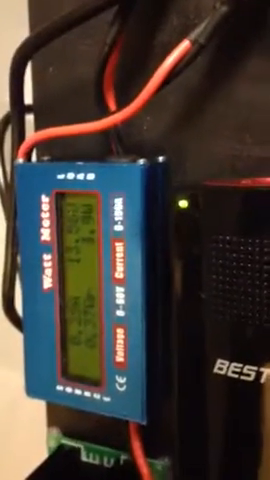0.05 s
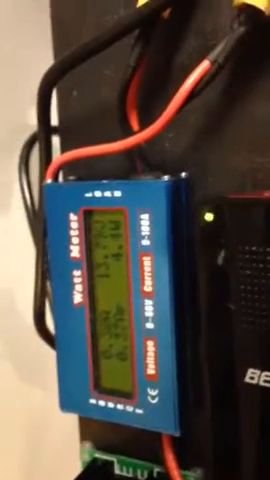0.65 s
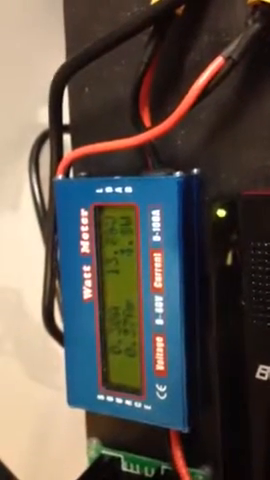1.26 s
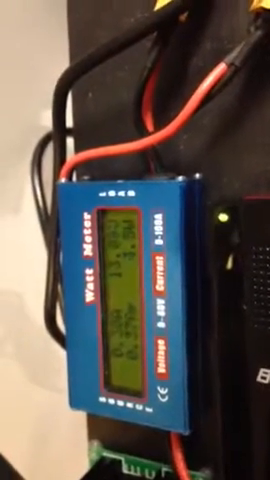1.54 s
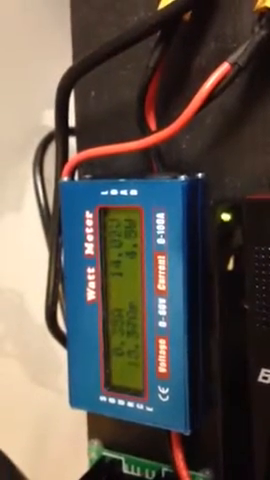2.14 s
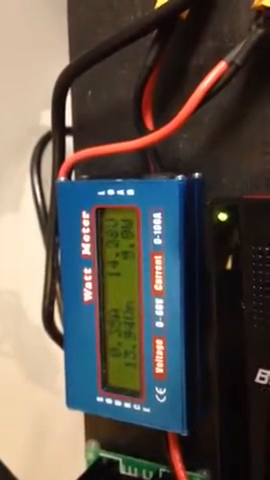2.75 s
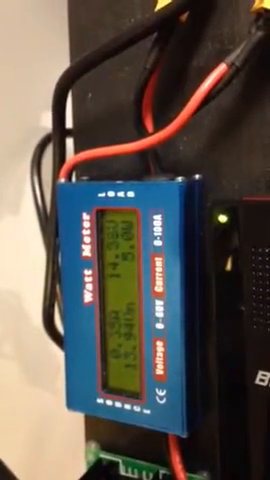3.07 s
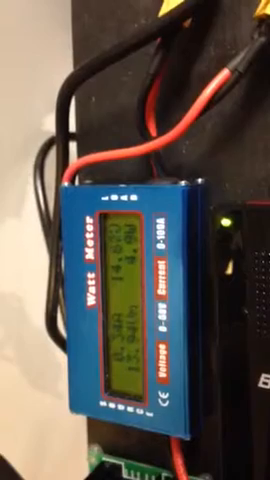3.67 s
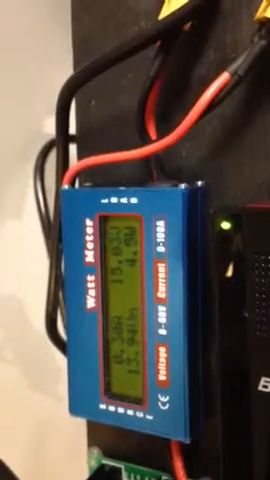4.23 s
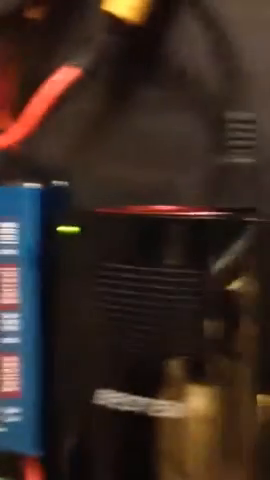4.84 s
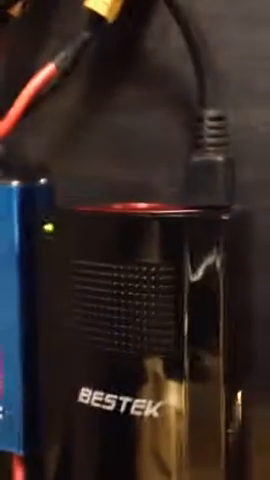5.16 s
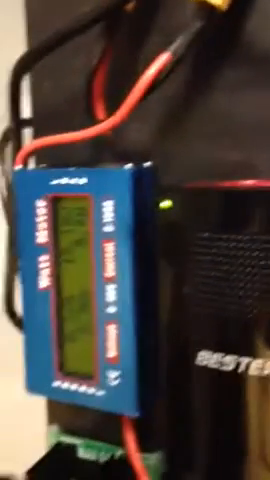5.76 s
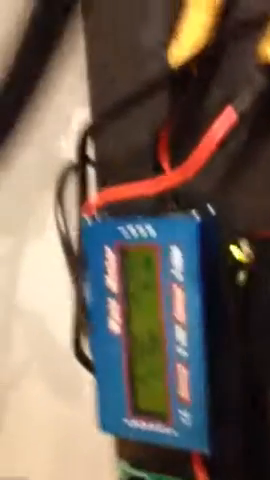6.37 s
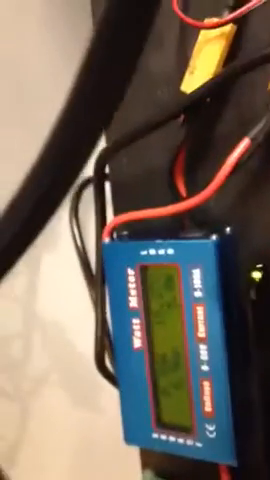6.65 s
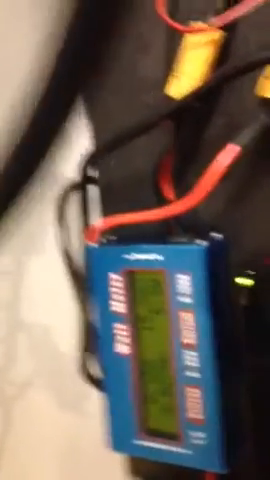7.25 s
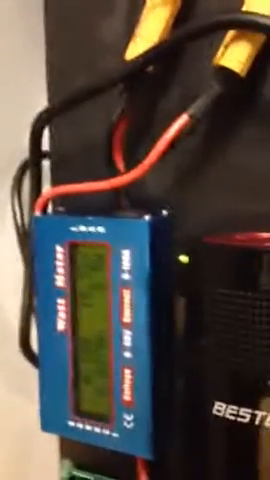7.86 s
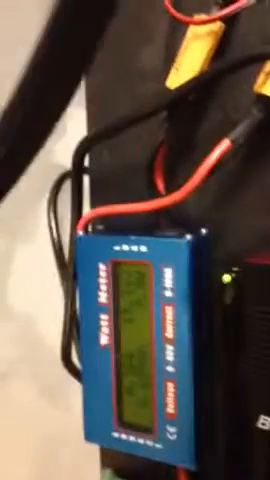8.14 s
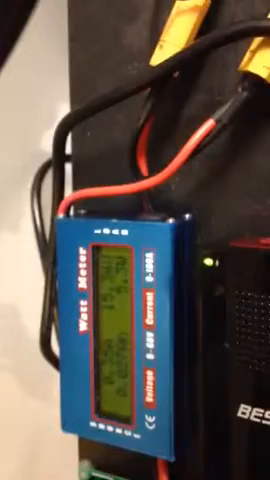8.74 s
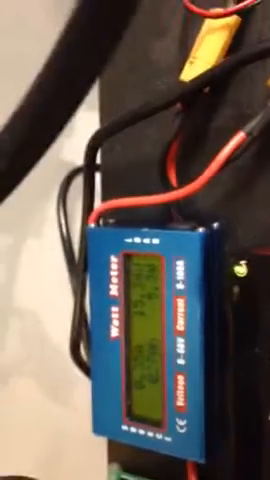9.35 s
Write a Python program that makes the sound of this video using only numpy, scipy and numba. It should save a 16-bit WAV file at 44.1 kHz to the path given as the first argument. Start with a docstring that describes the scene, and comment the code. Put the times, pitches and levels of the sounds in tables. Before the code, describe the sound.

Air rushes and hisses through a power inverter's fan, which hums and whines as it gradually speeds up.

```python
"""A power inverter's small cooling fan, slowly speeding up; indoors, close by, on a hand-held phone.
The shaft hums, and blade and motor orders swell and fade as they glide through fixed resonances.
Air rushes through the grille, louder with speed, over a faint room rumble. Short, dull swells and
thin whistles come and go. The microphone moves between a few resting places, each with its own
reflection and air gap, and picks up a fine sizzle when it faces the vent."""
import sys
import numpy as np
from scipy import signal
from scipy.fft import rfft, irfft, next_fast_len
from scipy.io import wavfile
from scipy.ndimage import uniform_filter1d
from numba import njit

SR = 44100
rng = np.random.default_rng(int(sys.argv[2]) if len(sys.argv) > 2 else 0)


def generate_wav(signal):
    """Clip the signal to [-1, 1] and save it as 16-bit WAV at the path in sys.argv[1]."""
    frames = np.transpose(np.atleast_2d(signal))
    scaled = np.clip(frames, -1, 1) * 32767
    pcm = np.round(scaled).astype(np.int16)
    wavfile.write(sys.argv[1], SR, pcm)


N = 419391
TIME = np.arange(N) / SR


def undb(db):
    """Decibels to gain."""
    return 10 ** (np.asarray(db) / 20)


def unit(x):
    """Scale to rms 1."""
    return x / np.sqrt(np.mean(x ** 2))


def noise(colour):
    """Noise of rms 1, shaped by (frequency [Hz], level [dB]) points and rolled off below the first."""
    size = next_fast_len(N)
    hz, db = np.transpose(colour)
    bins = np.maximum(np.arange(size // 2 + 1) * SR / size, 1)
    gain = undb(np.interp(np.log(bins), np.log(hz), db)) * np.minimum(bins / hz[0], 1) ** 2
    return unit(irfft(rfft(rng.standard_normal(size)) * gain, size)[:N])


def drift(rate_hz):
    """A smooth random curve of rms 1 that changes about rate_hz times a second."""
    step = int(SR / rate_hz)
    knots = rng.standard_normal(N // step + 2)
    joined = np.interp(np.arange(N) / step, np.arange(len(knots)), knots)
    return unit(uniform_filter1d(joined, step))


def tone(angle, flutter_db, flutter_hz):
    """A sine of rms near 1 whose level flutters."""
    return np.sqrt(2) * np.sin(angle + rng.uniform(0, 2 * np.pi)) * undb(flutter_db * drift(flutter_hz))


def hand_move(middle_s, move_s=0.21):
    """Goes from 0 to 1 as the hand carries the microphone to its next place."""
    return np.clip((TIME - middle_s) / move_s + .5, 0, 1)


# the fan speeding up (time [s], shaft speed [Hz])
SHAFT_SPEED = [(0.0, 170.3), (0.13, 169.8), (0.45, 170.6), (1.11, 171.1), (1.24, 172.3), (2.7, 177.3),
               (3.55, 181.3), (4.07, 184.8), (4.63, 187.3), (6.08, 188.3), (6.38, 189.0), (7.91, 189.8),
               (9.5, 191.2)]

def shaft(wander=0.000291):
    """The shaft's speed [Hz] and its angle [rad], which wanders a little."""
    speed = np.interp(TIME, *np.transpose(SHAFT_SPEED))
    angle = 2 * np.pi * np.cumsum(speed * (1 + wander * drift(9))) / SR
    return speed, angle


# peaks and notches of casing and room (frequency [Hz], half width [Hz], gain [dB])
RESONANCES = [(169.5, 4.2, -4), (183.24, 3.3, -10.5), (188.2, 2.05, -6), (358.4, 9, 7.5), (685, 14, 10),
              (1480, 49, 10), (3810, 180, 15.5), (4317, 190, -13), (4550, 40, 3.5), (4900, 84, 5),
              (5040, 42, -11), (5610, 76, -3.5), (6150, 164, -14)]
# standing-wave nulls the microphone sits in (entry [s], exit [s], order [x shaft speed], gain [dB])
MIC_NULLS = [(4.447, 4.7, 1, -5), (5.8, 7.3, 1, -3), (6.5, 7.5, 8, -4), (6.5, 7.45, 24, -19),
             (7.403, 8.15, 28, -11), (8.15, 9.15, 28, -7.5)]

def path_gain_db(order, speed):
    """From fan to microphone, an order glides through resonances and dips in standing-wave nulls."""
    speeds = np.linspace(speed.min(), speed.max(), 400)
    peaks = sum(db * np.exp(-((order * speeds - hz) / width) ** 2) for hz, width, db in RESONANCES)
    dips = sum(db * (hand_move(entry_s) - hand_move(exit_s))
               for entry_s, exit_s, nulled, db in MIC_NULLS if nulled == order)
    return np.interp(speed, speeds, peaks) + dips


# strong blade and motor orders, before the path to the microphone (order [x shaft speed], level [dB])
BLADE_WHINES = [(8, -63), (20, -85.5), (24, -71), (28, -67.3), (32, -69.5)]
# weak shaft orders, before the same path (order [x shaft speed], level [dB])
SHAFT_OVERTONES = [(2, -82), (3, -85.5), (4, -85.5), (5, -78), (10, -66.5), (16, -83), (25, -81.5),
                   (26, -80.5), (29, -86.5), (30, -86), (31, -88), (33, -85.5), (36, -84)]

def rotor(angle, speed, hum_db=-51.5, stray_db=-76):
    """Unbalance hums once a turn; blades and motor poles whine at multiples of it."""
    # stray room paths make the hum waver most where it is weak
    hum_gain = undb(hum_db + path_gain_db(1, speed)) + undb(stray_db) * drift(9)
    out = hum_gain * tone(angle, flutter_db=-0.3, flutter_hz=6.4)
    for order, db in BLADE_WHINES:
        out += undb(db + path_gain_db(order, speed)) * tone(order * angle, flutter_db=0.87, flutter_hz=22)
    for order, db in SHAFT_OVERTONES:
        out += undb(db + path_gain_db(order, speed)) * tone(order * angle, flutter_db=2.0, flutter_hz=4)
    return out


# air rush, close to the housing (frequency [Hz], relative level [dB])
RUSH_COLOUR = [(250, -33.5), (520, -21), (645, -25), (850, -12), (1020, -15), (1230, -3), (1380, -3.5),
               (1570, 0.5), (1760, -5), (1900, -4.5), (2150, -10.5), (2450, -10.5), (2950, -24),
               (3250, -20.5), (3650, -30.5), (4200, -28), (6200, -36.5), (9000, -53)]
# hiss, close to the grille (frequency [Hz], relative level [dB])
HISS_COLOUR = [(2000, -15), (4000, 11), (5700, 2.5), (6400, 1), (7000, 3), (8600, 0.5), (10500, -3.5),
               (12400, -10), (13400, -5), (15200, -11)]

def airflow(angle, speed, rush_gain_db, hiss_gain_db, reference_hz=188):
    """Turbulence rings the housing and hisses in the grille; both grow with speed."""
    octaves = np.log2(speed / reference_hz)
    rush_db = -46.5 + 16 * octaves + rush_gain_db
    hiss_db = -68.5 + 17 * octaves + hiss_gain_db
    rush = noise(RUSH_COLOUR) * undb(rush_db + 0.5 * drift(70))
    hiss = noise(HISS_COLOUR) * undb(hiss_db + 0.44 * drift(30))
    chopping = 1 + 0.14 * np.cos(4 * angle)  # four times a turn
    return rush + hiss * chopping


# where the microphone rests, all close to the fan (mid-move time [s], rush gain [dB], hiss gain [dB],
# reflection lag [ms], reflection share [0-1], air gap pitch [Hz], gap strength [0-1], facing vent [0-1])
MIC_PLACES = [(0, 0.05, 1, 0.25, 0.023, 3070, .06, 0), (4.8, 1, -1.7, 0.72, 0.046, 3190, .25, 1),
              (5.8, .4, 0.5, .6, 0.019, 3140, .12, 0.3), (6.42, -1.24, 0.7, 1.12, .18, 2545, 0.096, 0.3),
              (7.45, 0.1, 2.3, 0.27, 0.14, 2720, 0.024, .45), (8.2, -0.1, 0.5, .27, .12, 2660, .05, 0.5)]

def microphone_path():
    """The microphone holds each place, then slides to the next: one curve for each setting."""
    places = np.array(MIC_PLACES)
    path = places[0, 1:, None] + np.zeros(N)
    for before, after in zip(places, places[1:]):
        path += (after - before)[1:, None] * hand_move(after[0])
    return path


def reflection(x, lag_ms, share):
    """A near surface adds a late copy, so the colour shifts as the microphone moves."""
    late = np.arange(N) - lag_ms * SR / 1000
    return x + share * np.interp(late, np.arange(N), x)


@njit
def air_gap(x, hz, strength, damping=0.15):
    """Close to the casing the air gap rings: an added resonant high-pass gives a peak above a dip."""
    high = np.empty(len(x))
    band_state, low_state = 0., 0.
    for i in range(len(x)):
        tuning = np.tan(np.pi * hz[i] / SR)
        band = (band_state + tuning * (x[i] - low_state)) / (1 + tuning * (tuning + damping))
        low = low_state + tuning * band
        high[i] = x[i] - damping * band - low
        band_state, low_state = 2 * band - band_state, 2 * low - low_state
    return x + strength * high


# rumble of the room around the microphone (frequency [Hz], relative level [dB])
ROOM_COLOUR = [(20, -27), (32, 0), (55, -1.5), (75, 0), (110, 2.5), (138, 2), (165, 3), (230, -4),
               (360, -4), (600, -14.5), (1200, -49)]
# hums in the room (frequency [Hz], level [dB])
ROOM_HUMS = [(45.6, -73.5), (60, -76), (120, -85), (135, -72)]

def room_tone(rumble_db=-65.0):
    """Behind the fan, the room rumbles faintly with a few wavering hums."""
    hums = 0
    for hz, db in ROOM_HUMS:
        angle = 2 * np.pi * hz * TIME + 0.41 * drift(3)
        hums += undb(db) * tone(angle, flutter_db=1.4, flutter_hz=7)
    return undb(rumble_db) * noise(ROOM_COLOUR) + hums


# dull swells at the microphone: two from the fan's second harmonic near 350 Hz, then soft hand bumps
# (time [s], pitch [Hz], level [dB], half length [s])
LOW_SWELLS = [(1.254, 350, -64, 0.052), (1.85, 352, -67, 0.035), (2.3, 450, -64, 0.02),
              (2.863, 330, -63, .03), (4.097, 310, -64, .04), (5.224, 344, -61, 0.023)]

def low_swells(skirt_db=-17):
    """Each is a short, dull swell of noise round one pitch."""
    out = 0
    for peak_s, hz, db, half_length in LOW_SWELLS:
        body = noise([(hz / 2, skirt_db), (hz, 0), (hz * 2, skirt_db), (hz * 10, -70)])
        swell = np.exp(-.5 * ((TIME - peak_s) / half_length) ** 2)
        out += undb(db) * body * swell
    return out


# thin whistles, microphone off the vent's axis
# (start [s], fade start [s], resonance [Hz], width [Hz], level on resonance [dB])
TOP_WHISTLES = [(2.85, 8.1, 11230, 450, -82), (3.4, 6.4, 14700, 150, -89)]

def whistles(angle, speed, attack_s=0.4, release_s=0.7):
    """High orders sing one after another as they glide through a narrow resonance."""
    out = 0
    for start_s, fade_s, hz, width, db in TOP_WHISTLES:
        rise = np.clip((TIME - start_s) / attack_s, 0, 1)
        fall = np.exp(-np.maximum(TIME - fade_s, 0) / release_s)
        lowest = int((hz - width / 2) / speed.max())
        highest = int((hz + width / 2) / np.interp(start_s, TIME, speed))
        for order in range(lowest, highest + 1):
            resonance = 1 / (1 + (2 * (order * speed - hz) / width) ** 2)
            partial = tone(order * angle, flutter_db=0.5, flutter_hz=14)
            out += undb(db) * rise * fall * resonance * partial
    return out


# fine sizzle, microphone straight in front of the vent (frequency [Hz], relative level [dB])
SIZZLE_COLOUR = [(6000, -21), (9000, 3), (10900, 0), (12500, -5), (13800, -20)]

def vent_sizzle(facing, on_axis_db=-74.5):
    """Jets from the grille holes beam their treble forward, heard as the microphone faces them."""
    return undb(on_axis_db) * facing * noise(SIZZLE_COLOUR)


def scene():
    """Fan, room and hand at one close microphone."""
    speed, angle = shaft()
    rush_gain_db, hiss_gain_db, lag_ms, share, gap_hz, gap_strength, facing = microphone_path()
    air = airflow(angle, speed, rush_gain_db, hiss_gain_db)
    air = reflection(air, lag_ms, share)
    air = air_gap(air, gap_hz, gap_strength)
    sizzle = vent_sizzle(facing)
    whistling = whistles(angle, speed) * undb(-3 * facing)  # weaker in front of the vent
    return (rotor(angle, speed) + air + room_tone() + low_swells() + whistling + sizzle)[None]


def record(dry):
    """The phone cuts the top steeply above 15250 Hz."""
    return signal.sosfilt(signal.ellip(12, .1, 80, 15250, fs=SR, output="sos"), dry)


dry = scene()
out = record(dry)
generate_wav(out)
```